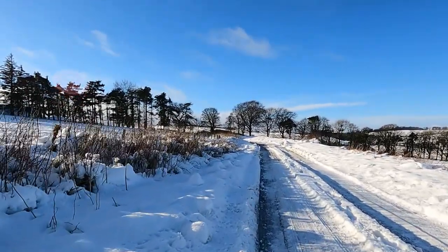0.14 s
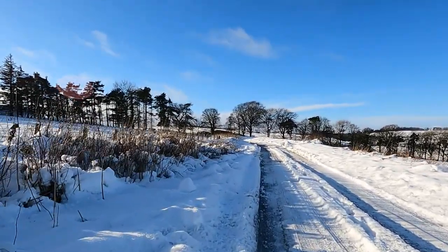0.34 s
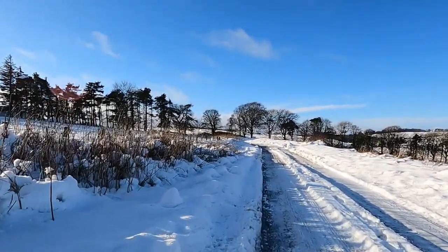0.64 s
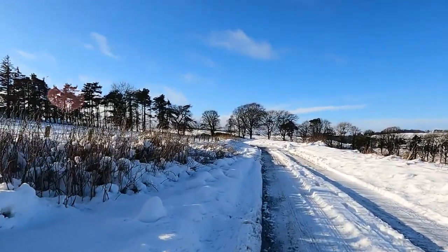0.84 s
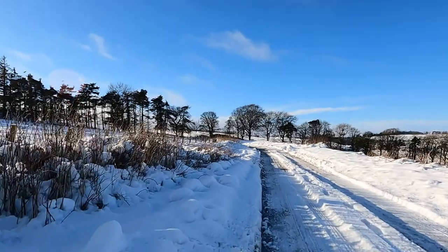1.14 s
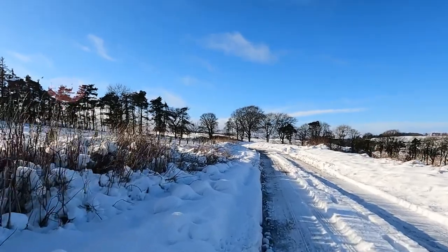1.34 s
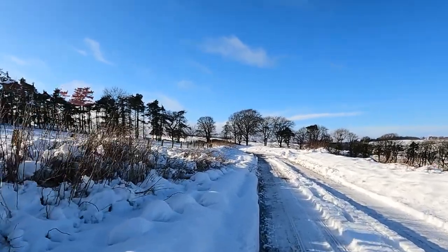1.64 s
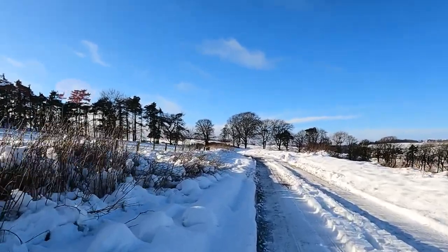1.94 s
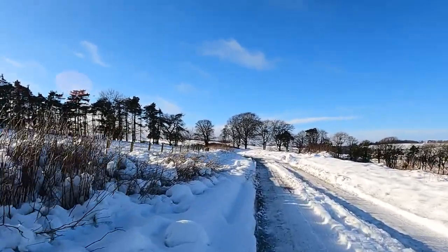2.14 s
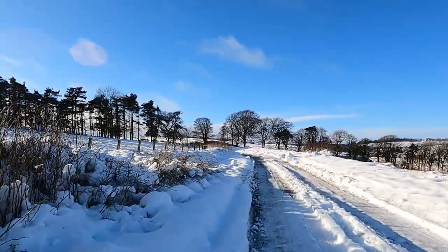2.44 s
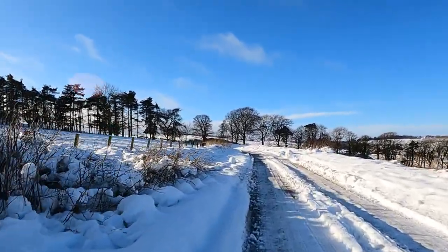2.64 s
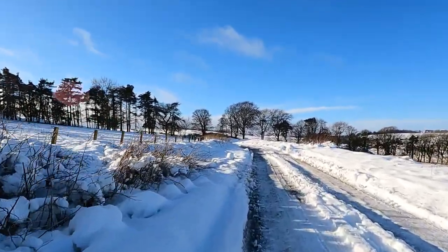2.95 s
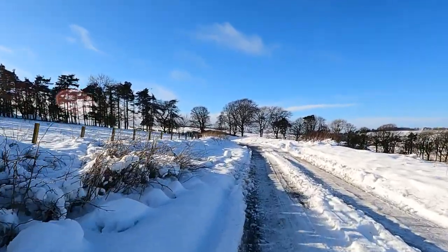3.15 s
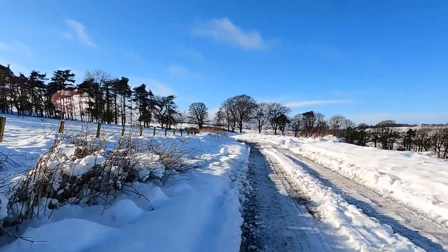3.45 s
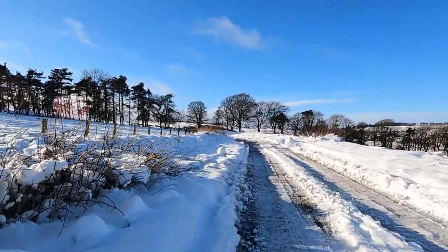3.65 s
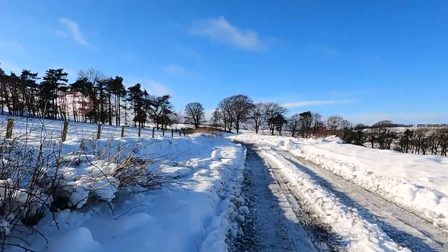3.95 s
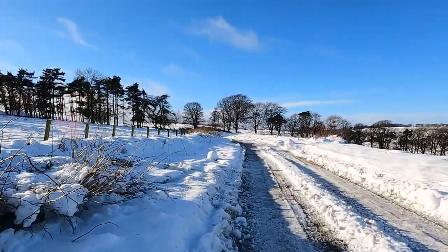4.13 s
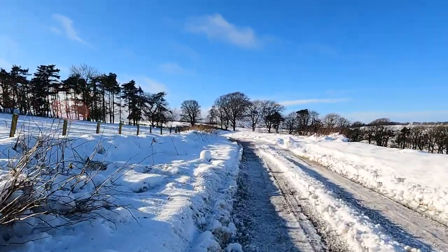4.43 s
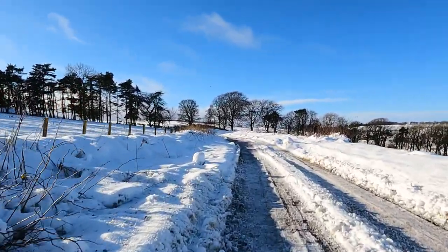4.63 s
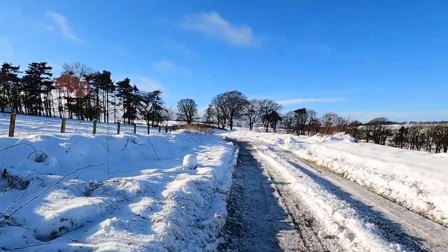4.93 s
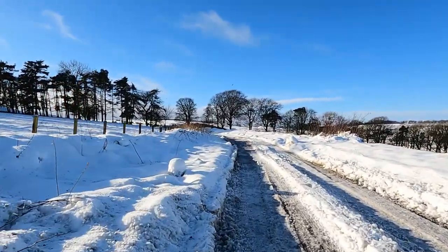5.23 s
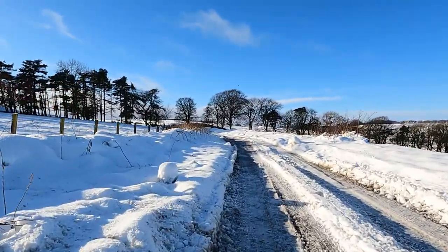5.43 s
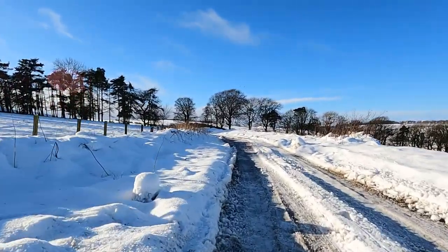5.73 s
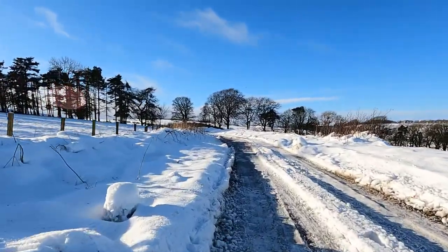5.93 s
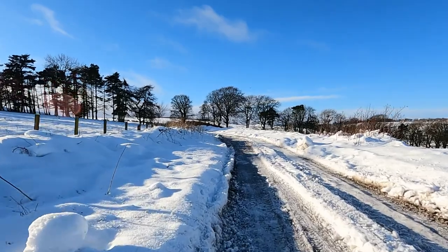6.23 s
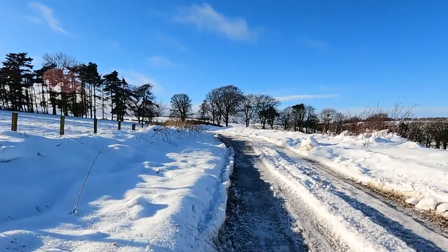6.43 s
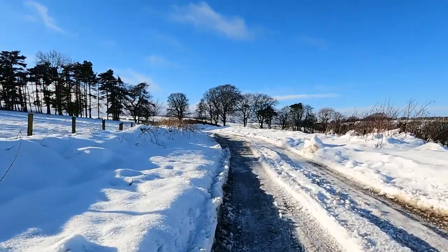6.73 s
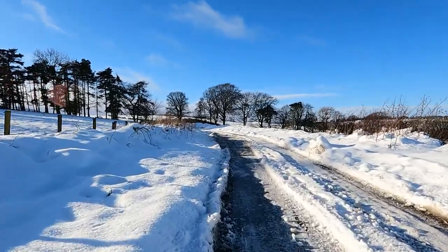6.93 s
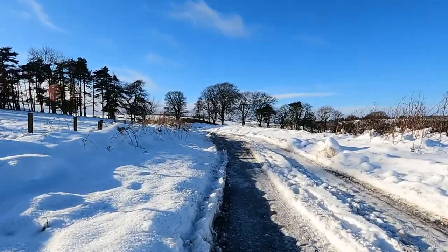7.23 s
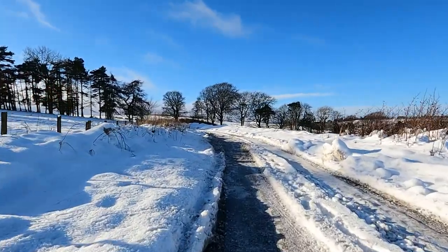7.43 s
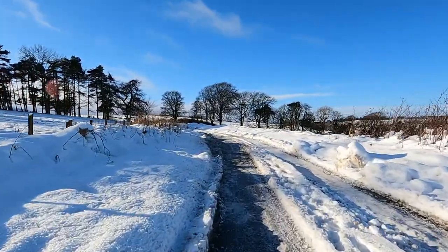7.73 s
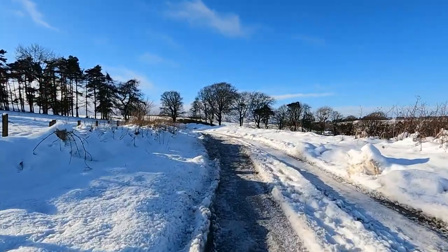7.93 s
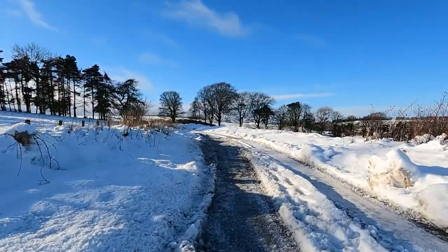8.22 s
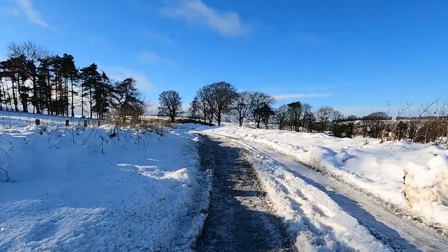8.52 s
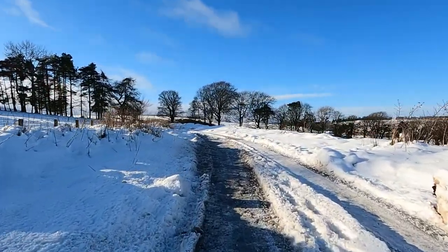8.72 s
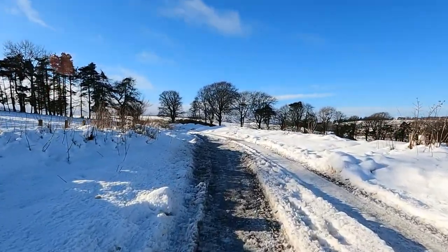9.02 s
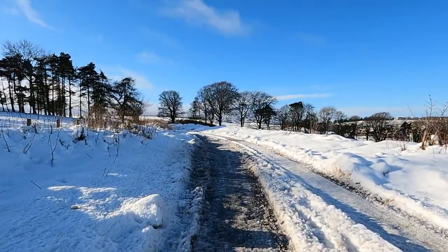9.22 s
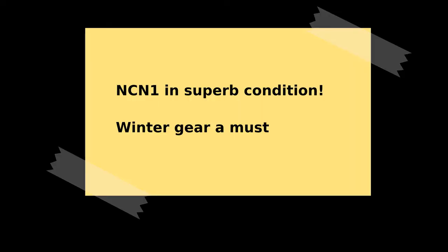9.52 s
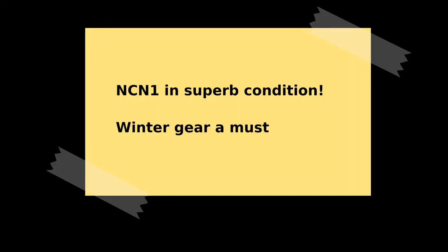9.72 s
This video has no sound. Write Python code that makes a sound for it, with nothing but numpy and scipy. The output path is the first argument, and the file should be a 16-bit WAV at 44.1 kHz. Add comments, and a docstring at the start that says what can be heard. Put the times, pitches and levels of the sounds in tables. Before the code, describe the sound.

Outdoors on an open snowy lane, a housed microphone rides close to bicycle tyres rolling slowly over packed snow and ice. Low wind rumbles and flutters throughout in random swells, with a faint airy fizz on top. From 0 to 0.7 s, hard low ice cracks cluster over coarse crunching; at 0.7 s comes a tiny falling snow squeak. The crunch thins around 1 s, then brighter crackles and crystal fizz return from 1.4 s, remaining moderate until about 4 s. A dense burst of snaps comes near 4.5 s, and crunching is heaviest from 6.2 to 7.4 s, with a strong wind buffet near 7.1 s. After a crack at 7.7 s it eases into sparse crackles and brief fizzes. Thin high ticks appear from 8.7 s, alongside isolated sharp cracks near 9 s. Everything stops abruptly at about 9.4 s, leaving silence.

```python
"""Wind buffets a microphone in a housing while bicycle tyres roll slowly over packed snow and ice.
The wind is shaped noise that swells at random. The crust breaks in coarse crunches and fine crystals fizz,
both built from thousands of tiny dying sines, with noise for slush. Single lumps of ice crack as sharp
troughs of pressure amid crumbs, and once the snow squeaks: a short falling tone.
A faint high fizz of noise runs throughout, joined by thin ticks near the end, and the sound stops short."""
import sys
import numpy as np
from scipy import signal
from scipy.fft import rfft, irfft, next_fast_len
from scipy.io import wavfile
from scipy.ndimage import uniform_filter1d, map_coordinates

SR = 44100
rng = np.random.default_rng(int(sys.argv[2]) if len(sys.argv) > 2 else 0)


def store_pcm(level_fs):
    """Save levels as 16-bit WAV."""
    pcm = np.round(np.clip(level_fs, -1, 1) * 32767).astype(np.int16)
    wavfile.write(sys.argv[1], SR, np.atleast_2d(pcm).T)


N = 435266  # length [samples]
STOP_S = 9.3765  # silence from here on [s]
TOP_HZ = 15700  # upper band limit [Hz]


def amp(db):
    """Turn decibels into a plain multiplier."""
    return 10 ** (np.asarray(db) / 20)


def unit(x):
    """Scale x to an average strength (rms) of 1."""
    return x / np.sqrt(np.mean(x ** 2) + 1e-20)


def curves(rows):
    """Draw straight lines between the rows: one value per sample for each column after the time."""
    times, *columns = np.transpose(rows)
    t = np.arange(N) / SR
    return [np.interp(t, times, column) for column in columns]


def bumps(rows):
    """Add up bell-shaped bumps from rows of (time [s], height, half length [s])."""
    t = np.arange(N) / SR
    return sum(height * np.exp(-((t - s) / half) ** 2) for s, height, half in rows)


def wobble(rate):
    """A smooth random curve with about rate random points a second, at most 400."""
    knots = rng.standard_normal(4000)
    return map_coordinates(knots, [np.arange(N) * min(rate, 400) / SR])


def coloured(x, points):
    """Make each pitch range of x louder or softer, following (frequency [Hz], level [dB]) points."""
    size = next_fast_len(N + 8192)  # spare room so the end does not wrap round to the start
    hz, db = np.transpose(points)
    log_hz = np.log(np.fft.rfftfreq(size, 1 / SR) + 1)
    gain = amp(np.interp(log_hz, np.log(hz), db))
    return irfft(rfft(x, size) * gain, size)[:N]


def patchy(x, depth_db):
    """Give small patches of x, in time and frequency, their own random loudness."""
    z = signal.stft(x, nperseg=256)[2]
    field = uniform_filter1d(rng.standard_normal(z.shape), size=4, axis=0)
    field = uniform_filter1d(field, size=7, axis=1)
    return signal.istft(z * amp(depth_db * unit(field)), nperseg=256)[1][:N]


def grains(s, hz, gain, cycles, size):
    """Tiny fractures: sines that swell within a fraction of a cycle and fall 20 dB in the given cycles."""
    k = np.arange(size)
    turns = np.outer(np.clip(hz, 1, SR / 3), k / SR)
    swell = 1 - np.exp(-turns / 0.17)
    decay = amp(-20 * turns / cycles)
    waves = gain[:, None] * np.sin(2 * np.pi * turns) * decay * swell
    at = np.clip(np.round(s * SR).astype(int), 0, N)[:, None] + k
    return np.bincount(at.ravel(), waves.ravel(), N + size + 1)[:N]


# How hard the wind blows: (time [s], buffet level [dB], flutter level [dB])
WIND_LEVELS = [(0.0, -20, -39), (0.15, -23.5, -35), (0.31, -18, -44.5), (0.34, -23.5, -37),
               (0.57, -19, -37.5), (0.78, -25, -40), (1.09, -17, -33.5), (1.23, -20, -44),
               (1.28, -22.5, -35), (1.33, -17, -36), (1.56, -23.5, -39), (1.64, -17, -39),
               (1.75, -26.5, -40), (1.85, -17.5, -36), (2.04, -15.5, -35), (2.09, -19.5, -38.5),
               (2.22, -21.5, -36.5), (2.61, -21, -40.5), (2.63, -18, -30.5), (2.74, -23.5, -39.5),
               (3.16, -21, -36.5), (3.21, -18, -36), (3.68, -22, -38.5), (3.83, -16.5, -30.5),
               (4.12, -20, -42), (4.43, -20.5, -33), (4.7, -18, -43.5), (4.72, -28.5, -40),
               (4.77, -18.5, -37), (5.64, -22.5, -43), (5.84, -19.5, -31), (5.92, -22, -35.5),
               (6.81, -21.5, -35.5), (6.99, -22, -40), (7.07, -14, -30), (7.18, -26.5, -33),
               (7.25, -22.5, -42.5), (7.33, -22, -40), (7.8, -24, -35.5), (8.64, -23, -40),
               (8.66, -29.5, -44.5), (8.92, -25.5, -37.5), (9.27, -28, -39.5), (9.37, -32.5, -52)]
# Short puffs: (time [s], level [dB], half length [s])
PUFF_TIMES = [(2.086, -21, 0.022), (2.65, -42, 0.03), (3.249, -24, 0.015), (3.315, -36, 0.007),
              (6.523, -27, 0.024), (7.068, -33, 0.012), (8.907, -40, 0.0094)]
# Tone of slow buffets, faster flutter and puffs: (frequency [Hz], relative level per Hz [dB])
BUFFET_TONE = [(10, -13), (25, 0), (60, -1.5), (110, -6), (150, -15), (220, -35.5), (400, -63.5),
               (900, -120)]
FLUTTER_TONE = [(100, -23), (160, -5.5), (250, -6), (330, -14), (600, -21.5), (1200, -30), (3000, -46.5),
                (7000, -120)]
PUFF_TONE = [(150, -3.5), (300, -2.5), (450, -6.5), (900, -17.5), (1200, -30.5), (2500, -52.5),
             (6000, -120)]


def wind():
    """Eddies push the membrane slowly; faster flutter rides on them and puffs blow in the port."""
    buffet_db, flutter_db = curves(WIND_LEVELS)
    t, eddies = np.arange(N) / SR, wobble(14)
    buffet = unit(amp(1.5 * eddies) * coloured(rng.standard_normal(N), BUFFET_TONE))
    flutter_swell = amp(2 * eddies + 2.4 * wobble(35))
    flutter = unit(flutter_swell * coloured(rng.standard_normal(N), FLUTTER_TONE))
    puff_shape = sum(amp(db) * np.exp(-((t - s) / half) ** 2) for s, db, half in PUFF_TIMES)
    uneven = amp(2 * wobble(110))
    puff = puff_shape * unit(uneven * coloured(rng.standard_normal(N), PUFF_TONE))
    return amp(buffet_db) * buffet + amp(flutter_db) * flutter + puff


# The crunch before lulls and fizzes: (time [s], crust level [dB], crystal level [dB])
TREAD_LEVELS = [(0.0, -34, -47), (0.13, -37.5, -54), (0.92, -45.5, -50), (1.25, -39, -43),
                (1.43, -43.5, -44.5), (1.74, -42, -36.5), (1.9, -45, -40.5), (2.33, -43, -42.5),
                (2.92, -36.5, -47.5), (3.43, -49, -51), (3.76, -43, -41), (3.94, -40.5, -42),
                (4.25, -36.5, -48), (4.59, -33.5, -41), (5.15, -41.5, -47), (5.64, -36.5, -39),
                (6.23, -35.5, -37), (6.61, -34.5, -45), (6.94, -33, -35.5), (7.69, -39.5, -41),
                (8.02, -44.5, -48), (8.28, -44, -57), (8.56, -47, -45.5), (9.2, -46, -49.5)]
# The whole crunch thins briefly: (time [s], depth [dB], half length [s])
CRUNCH_LULLS = [(0.932, 2.5, 0.13), (1.15, 8.5, 0.056), (1.76, 8.5, 0.027), (2.588, 7, 0.02),
                (2.933, 6, 0.12), (3.294, 9, 0.014), (3.726, 3, 0.023), (4.218, 6.5, 0.0097),
                (4.35, 5.5, 0.023), (4.574, 14, 0.0078), (4.725, 12.5, 0.028), (4.829, 6.5, 0.0099),
                (5.03, 1, 0.006), (5.122, 12.5, 0.015), (5.222, 11, 0.015), (5.533, 7.5, 0.045),
                (5.65, 6, 0.11), (5.9, 6, 0.065), (5.982, 7.5, 0.012), (6.473, 2, 0.018),
                (7.251, 4.5, 0.071), (7.565, 3.5, 0.047), (7.682, 7.5, 0.02), (9.035, 6, 0.013),
                (9.178, 3, 0.042)]
# The crystals alone fizz up: (time [s], rise [dB], half length [s])
CRYSTAL_FIZZES = [(.6, 5, 0.011), (1.41, 8, 0.021), (1.83, 3.5, 0.044), (2.22, 7, 0.084), (2.8, 10, 0.045),
                  (3.37, 11.5, 0.017), (3.55, 7, 0.076), (4.62, 5, 0.055), (4.86, 4.5, 0.014),
                  (5.165, 9, 0.026), (6.41, 14, 0.01), (7.0, 0.5, 0.071), (7.86, 11, 0.019),
                  (8.24, 14.5, 0.0098), (8.36, 11, 0.11), (8.477, 7, 0.015), (8.83, 10.5, 0.023)]


def tread():
    """Levels of crust and crystals in dB, with their lulls and fizzes."""
    crust_db, crystal_db = np.array(curves(TREAD_LEVELS)) - bumps(CRUNCH_LULLS)
    return crust_db, crystal_db + bumps(CRYSTAL_FIZZES)


def crunch(count, hz, octaves, drift, spread_db, cycles, size):
    """A random shower of fractures, a few far larger; neighbours in time share a colour; rms 1."""
    when, chance, sign = rng.random((count, 3)).T
    patch = wobble(35)[(when * N).astype(int)]
    pitch = hz * 2 ** (octaves * rng.standard_normal(count) + drift * patch)
    strength = amp(-spread_db * np.log(np.maximum(chance, 4e-3)))  # the floor limits the largest
    gain = np.sign(sign - .5) * strength
    return unit(grains(when * N / SR, pitch, gain, cycles, size))


# Tone of slush and air: (frequency [Hz], relative level per Hz [dB])
SLUSH_TONE = [(250, -18), (500, 1.5), (1400, 5), (2300, 1), (3500, -1), (7000, -11), (16000, -41)]
SLUSH_DB = 2.5  # slush over the mean of the crust and crystal levels [dB]


def tyres():
    """The crust gives way in random clumps under the tread, coarse and fine fractures together."""
    crust_db, crystal_db = tread()
    slush_db = (crust_db + crystal_db) / 2 + SLUSH_DB
    clumps = 1.6 * wobble(30) + 2.1 * wobble(90)  # [dB]
    crust = crunch(count=5000, hz=1290, octaves=0.55, drift=0.15, spread_db=2.5, cycles=1.5, size=180)
    crystals = crunch(count=15000, hz=3705, octaves=0.38, drift=0.25, spread_db=0.5, cycles=3.9, size=110)
    slush = patchy(coloured(rng.standard_normal(N), SLUSH_TONE), depth_db=3)
    crust = unit(amp(clumps + 0.81 * wobble(30)) * crust)
    crystals = unit(amp(clumps + 0.83 * wobble(30)) * crystals)
    slush = unit(amp(0.27 * clumps) * slush)
    return amp(crust_db) * crust + amp(crystal_db) * crystals + amp(slush_db) * slush


# The faint fizz: (time [s], level [dB])
AIRY_LEVELS = [(0.0, -70), (0.82, -75.5), (1.82, -72), (3.33, -74), (4.33, -78.5), (5.66, -81),
               (6.18, -77.5), (8.41, -72.5), (8.68, -76), (9.2, -71)]
# Tone of the fizz: (frequency [Hz], relative level per Hz [dB])
AIRY_TONE = [(6000, -64), (9000, -2), (10500, -9.5), (12400, -13), (14000, -20), (15700, -24)]
# Thin high ticks: (time [s], level before a 7 dB lift [dB])
HIGH_TICKS = [(8.7304, -64), (8.7568, -46), (8.7992, -52), (8.869, -52), (8.9324, -53), (8.9838, -45),
              (9.0616, -55), (9.115, -55), (9.189, -47)]


def airy():
    """A faint fizz of noise at the top of the range, with thin ticks of quickly dying sines."""
    s, db = np.transpose(HIGH_TICKS)
    pitch = 12400 * 2 ** (.03 * rng.standard_normal(len(s)))
    ticks = grains(s, pitch, amp(db + 7), cycles=5, size=100)
    flicker = amp(5.3 * wobble(24) + 2.6 * wobble(65))
    fizz = unit(flicker * coloured(rng.standard_normal(N), AIRY_TONE))
    return ticks + amp(curves(AIRY_LEVELS)[0]) * fizz


# Small lumps: level over the crust [dB] and its scatter [dB], middle pitch [Hz] and its scatter [octaves]
LUMP_DB, LUMP_SCATTER_DB, LUMP_HZ, LUMP_OCTAVES = 12.5, 2.5, 1500, .4
LUMP_RUBBLE_DB = -27  # middle of the crumb and splinter columns [dB]


def lumps(count=500):
    """Small lumps at chance moments, louder where the crust is louder; rows like the loud ones."""
    when = rng.random(count) * STOP_S
    size, tone, crumbly, bright = rng.standard_normal((count, 4)).T
    crust_db = tread()[0][(when * SR).astype(int)]
    db = crust_db + LUMP_DB + LUMP_SCATTER_DB * size
    hz = LUMP_HZ * 2 ** (LUMP_OCTAVES * tone)
    return np.transpose([when, db, hz, LUMP_RUBBLE_DB + 3 * crumbly, LUMP_RUBBLE_DB + 4 * bright])


SNAP_RISE, SNAP_FADE = .6, .55  # width before and after the trough [cycles]
SNAP_EDGE = 1.35  # the fall into the trough is this many times faster than the recovery


def snaps(s, hz, gain, size=240):
    """One sharp trough of pressure between two small crests."""
    at = np.round(s * SR).astype(int)[:, None] + np.arange(size) - size // 2
    turns = (at / SR - s[:, None]) * hz[:, None]
    turns = np.where(turns < 0, SNAP_EDGE * turns, turns)
    width = np.where(turns < 0, SNAP_RISE, SNAP_FADE)
    waves = -np.cos(2 * np.pi * turns) * np.exp(-(turns / width) ** 2)
    return np.bincount(np.clip(at, 0, N).ravel(), (gain[:, None] * waves).ravel(), N + 1)[:N]


# Loud ice lumps, before the housing dulls them:
# (time [s], snap level [dB], pitch [Hz], crumbs relative to snap [dB], splinters relative to snap [dB])
LOUD_CRACKS = [(0.0632, -12, 950, -18.5, -32), (0.0696, -19, 1510, -12, -36),
               (0.0814, -22.5, 1760, -22, -28), (0.1182, -9.5, 950, -14, -31),
               (0.1296, -22.5, 1020, -16, -28), (0.1588, -27, 1260, -26.5, -35),
               (0.1893, -18.5, 1340, -19, -31), (0.248, -31, 1190, -28.5, -26),
               (0.3645, -11.5, 1100, -18, -27), (0.388, -19.0, 950, -16, -25), (0.438, -25, 960, -8, -18),
               (0.4538, -18.0, 960, -13, -33), (0.6931, -15.5, 1110, -20, -27.5),
               (1.4372, -19, 950, -19, -18), (1.575, -21, 2590, -20, -7), (1.5802, -19, 1920, -8, -18),
               (1.6151, -16.5, 1520, -32, -22), (1.6405, -15, 2320, -18.5, -20),
               (1.6453, -14.5, 2590, -28, -27), (1.6826, -26, 1340, -27, -8), (1.7875, -18, 1190, -26, -35),
               (1.8686, -25.5, 2590, -25, -21), (2.1757, -18.5, 1090, -19.5, -15.5),
               (2.2863, -19.5, 1190, -24, -12), (2.3157, -16.5, 1520, -18, -20),
               (2.4714, -18, 2590, -12, -19), (2.6569, -22, 2100, -15, -10), (2.7862, -27, 1090, -23, -30),
               (2.8341, -20.0, 1630, -16, -15), (3.1677, -21, 1520, -11, -25.5),
               (3.1997, -18, 1260, -28, -23), (3.2537, -19.5, 950, -17, -32), (3.4584, -24, 950, -13, -13),
               (3.7669, -21, 1080, -15, -21), (3.9974, -14.5, 1340, -37, -35),
               (4.023, -17.5, 1420, -17, -22), (4.1087, -17, 1630, -19, -36),
               (4.1821, -19.0, 1630, -9, -17), (4.1871, -19, 1420, -14.5, -26),
               (4.2555, -19, 1900, -10, -14.5), (4.365, -19.5, 980, -20, -35),
               (4.3865, -14.5, 1590, -35, -37), (4.4378, -19, 1760, -16, -14),
               (4.4669, -14, 1520, -14.5, -23), (4.5109, -13.5, 1420, -16.5, -15),
               (4.5193, -12.5, 1140, -13.5, -20), (4.5253, -13, 1140, -15.5, -23),
               (4.5317, -12.0, 1760, -11, -31), (4.5578, -10.5, 1414, -22.5, -29.5),
               (4.6845, -18.5, 1210, -14.5, -18.5), (4.7741, -22.5, 2540, -2.5, -13),
               (4.7858, -12.5, 1340, -14.5, -29), (4.9796, -10.5, 1630, -23, -22.5),
               (5.0624, -19.5, 2500, -11, -19), (5.2789, -13.5, 1770, -16, -34),
               (5.3426, -10.5, 1800, -18, -26.5), (5.4287, -18.5, 1210, -15, -18),
               (5.778, -14, 1340, -27, -32), (5.7935, -16.5, 1120, -15, -23), (5.854, -21, 1520, -33, -9),
               (5.9421, -16.5, 1260, -29, -13.5), (6.008, -23.5, 2320, -26, -16.5),
               (6.029, -14.5, 1110, -17, -23), (6.1546, -17.0, 1190, -18, -20),
               (6.2176, -11.5, 1140, -14.5, -27), (6.2248, -10.5, 1010, -24, -37.5),
               (6.2324, -18, 1080, -21.5, -35), (6.3017, -16, 2590, -23.5, -17.5),
               (6.3678, -14.5, 1420, -16, -18.5), (6.3776, -12, 980, -19, -25),
               (6.3855, -12, 1760, -17.5, -17), (6.4355, -18, 1270, -27, -22.5),
               (6.5128, -13.5, 1420, -15, -23), (6.5256, -11.0, 1530, -24.5, -17),
               (6.5349, -13.5, 1190, -22, -16.5), (6.5474, -15.5, 1530, -16, -22.5),
               (6.5525, -11.5, 1760, -12.5, -31), (6.5727, -11, 2100, -24, -34),
               (6.6194, -13.0, 950, -21, -15), (6.6346, -16.5, 2100, -9.5, -20),
               (6.6454, -13.5, 1330, -12, -21.5), (6.6523, -13.5, 1260, -28.5, -25.5),
               (6.6624, -10, 1080, -21.5, -30), (6.7473, -8.5, 1520, -27, -41),
               (6.854, -11.0, 1630, -23, -19.5), (6.9684, -17, 1190, -13, -15.5),
               (7.0218, -17.5, 1330, -17, -20), (7.109, -17.5, 1920, -17, -30),
               (7.141, -21, 1760, -22.5, -22), (7.1567, -13, 1080, -16, -18.5),
               (7.1609, -10, 1070, -18, -25), (7.2148, -15, 1520, -13.5, -34.5),
               (7.3149, -17.5, 980, -20.5, -15), (7.3671, -13.5, 1630, -20.5, -15),
               (7.3881, -16.5, 1260, -9.5, -17), (7.4108, -10.5, 1090, -22.5, -21),
               (7.6533, -17.5, 1520, -12, -35), (7.7231, -21, 1260, -15, -21), (7.7335, -9, 1190, -24, -21),
               (7.9154, -18.5, 1520, -15, -29), (8.2763, -21, 1340, -35, -33),
               (8.3396, -18, 1250, -14.5, -32), (8.676, -19.5, 1630, -12.5, -27),
               (8.6831, -21.0, 1190, -26, -28), (8.7437, -24.0, 1760, -25, -22),
               (8.9346, -21.5, 1210, -18, -13), (8.9765, -10.5, 1620, -21, -20.5),
               (9.0795, -24, 2590, -8, -15), (9.1165, -11.5, 1570, -17.5, -17.5),
               (9.2145, -15.5, 1900, -22, -23), (9.2356, -22, 2590, -20, -15),
               (9.26, -22, 1630, -21, -24.5), (9.3, -10.5, 2590, -19, -20)]
CRUMB_DB, SPLINTER_DB = 6.5, 10  # lift of each piece over its column [dB]
CRUMBLE_S, CRUMBLE_LAG_S = .0062, .001  # spread of the pieces and their mean delay [s]
RUBBLE_OCTAVES, SPLINTER_HZ = .45, 3660  # pitch spread of crumbs [octaves], pitch of splinters [Hz]
PIECE_FALL_DB = 3.5  # pieces are this much weaker per spread away from the middle, early or late [dB]


def cracks(count=36):
    """A lump snaps once amid many smaller crumbs of like pitch and bright splinters."""
    rows = np.vstack([LOUD_CRACKS, lumps()])
    s, db, hz, crumb_db, splinter_db = np.transpose(rows)[:, :, None]
    draws = rng.standard_normal((len(s), 2, count, 3))
    lag, shift, level = np.moveaxis(draws, (3, 1), (0, 1))  # each holds crumbs, then splinters
    when = s + CRUMBLE_LAG_S + CRUMBLE_S * lag
    crumb_hz = hz * 2 ** (RUBBLE_OCTAVES * shift[0])
    splinter_hz = SPLINTER_HZ * 2 ** (.17 * shift[1])
    pitch = np.array([crumb_hz, splinter_hz])
    piece_db = db + np.array([crumb_db + CRUMB_DB, splinter_db + SPLINTER_DB])
    piece_db = piece_db + 2 * level - PIECE_FALL_DB * abs(lag)
    gain = np.sign(lag * shift) * amp(piece_db)  # some pieces push, some pull
    pieces = grains(when.ravel(), pitch.ravel(), gain.ravel(), cycles=2.16, size=150)
    return snaps(s[:, 0], hz[:, 0], amp(db[:, 0])) + pieces


# Start [s], level before the housing [dB], starting pitch [Hz], fall in pitch [Hz per s]
SQUEAK_S, SQUEAK_DB, SQUEAK_HZ, SAG_HZ_PER_S = .699, -32, 1330, 5500
SQUEAK_ATTACK_S, SQUEAK_HOLD_S, SQUEAK_RELEASE_S = .004, .015, .006  # [s]


def squeak():
    """Packed dry snow slips fast and unevenly for a moment, falling in pitch."""
    t = np.arange(N) / SR - SQUEAK_S
    hz = SQUEAK_HZ - SAG_HZ_PER_S * np.clip(t, 0, .1)
    uneven_hz = hz * (1 + 0.03 * wobble(250))
    tone = np.sin(2 * np.pi * np.cumsum(uneven_hz) / SR)
    corners = np.cumsum([0, SQUEAK_ATTACK_S, SQUEAK_HOLD_S, SQUEAK_RELEASE_S])
    shape = np.interp(t, corners, [0, 1, 1, 0])
    return amp(SQUEAK_DB) * shape * tone


# How the housing dulls sound: (frequency [Hz], gain [dB])
HOUSING_TONE = [(800, -0.75), (1060, -3), (1350, -0.5), (2200, -0.5), (3600, -0.5), (5000, -0.5),
                (6200, -6.5), (7500, -4.5), (9000, -12.5), (12500, -15.5), (15500, -50.5)]


def scene():
    """The housing dulls what arrives from the wheels; wind and airy fizz bypass it."""
    breeze = wind()
    wheels = tyres() + cracks() + squeak()
    return (breeze + coloured(wheels, HOUSING_TONE) + airy())[None]


def record(dry):
    """Cut everything above the band limit, and stop the sound short."""
    wet = coloured(dry[0], [(TOP_HZ, 0), (TOP_HZ + 100, -120)])
    return (wet * (np.arange(N) < STOP_S * SR))[None]


dry = scene()
out = record(dry)
store_pcm(out)
```